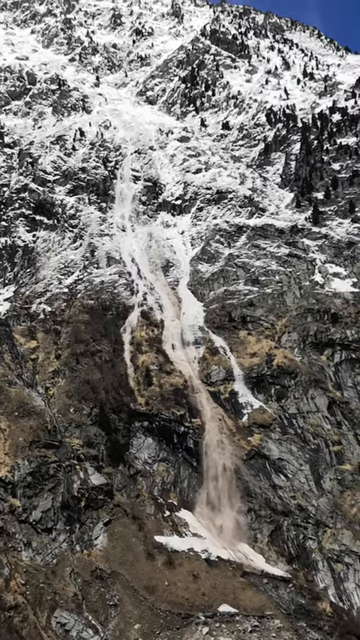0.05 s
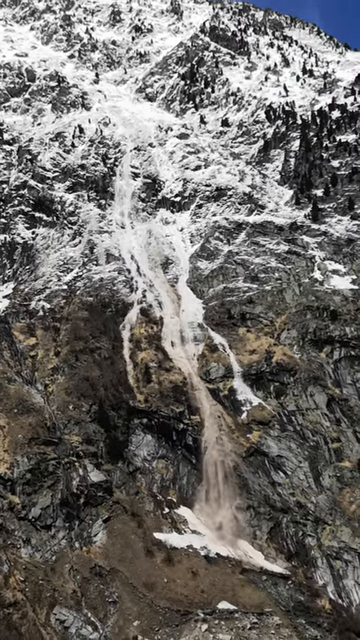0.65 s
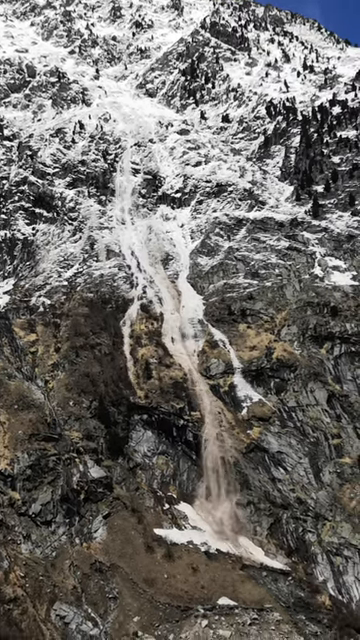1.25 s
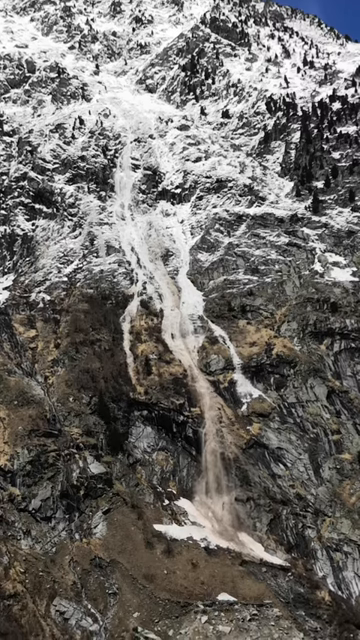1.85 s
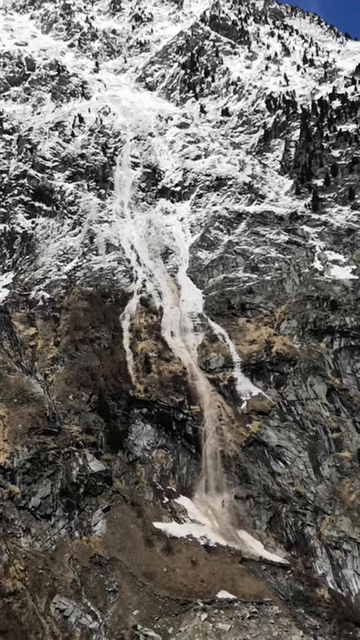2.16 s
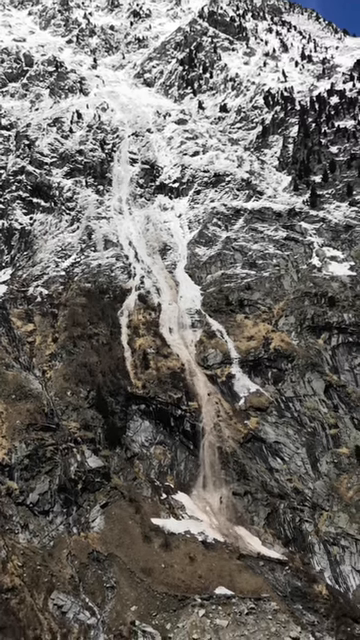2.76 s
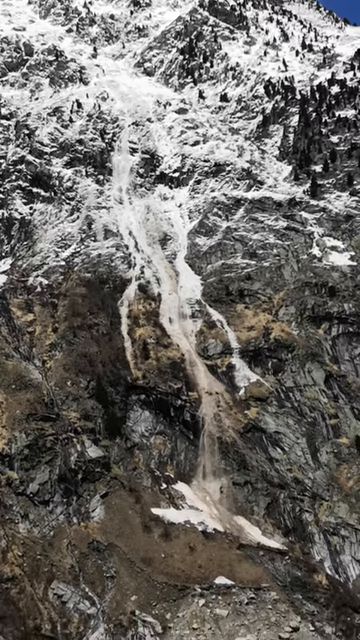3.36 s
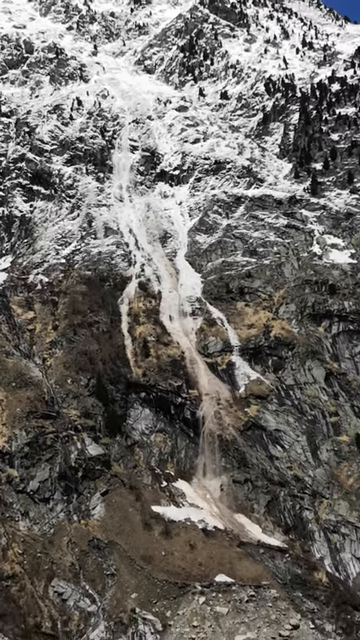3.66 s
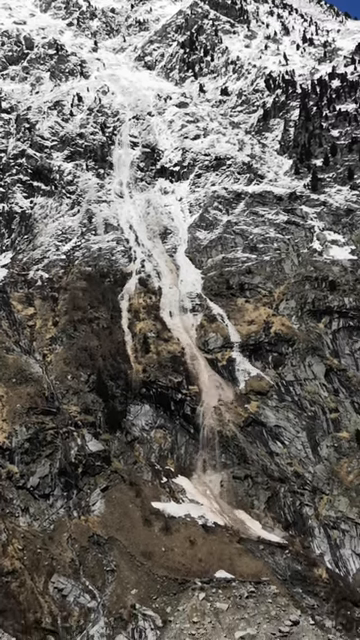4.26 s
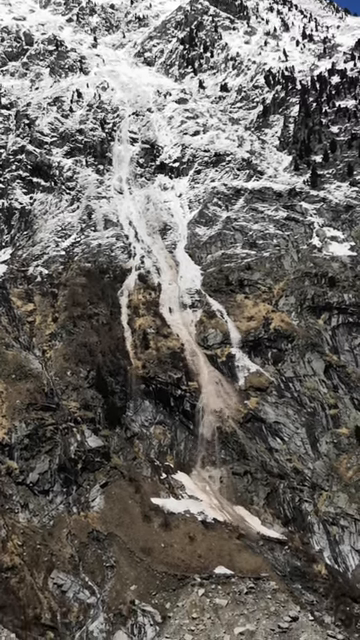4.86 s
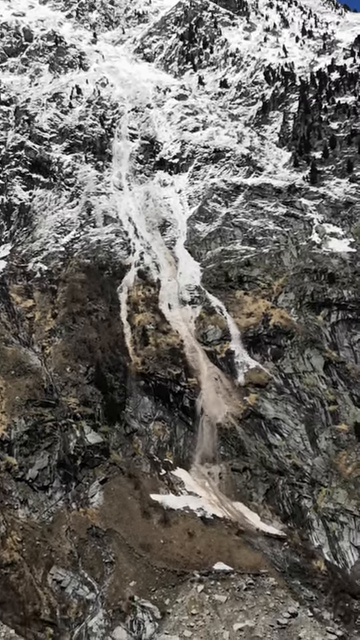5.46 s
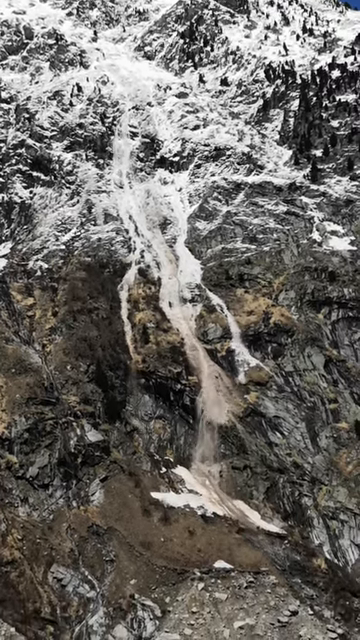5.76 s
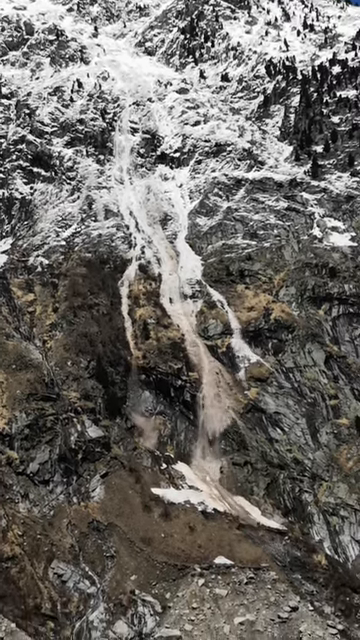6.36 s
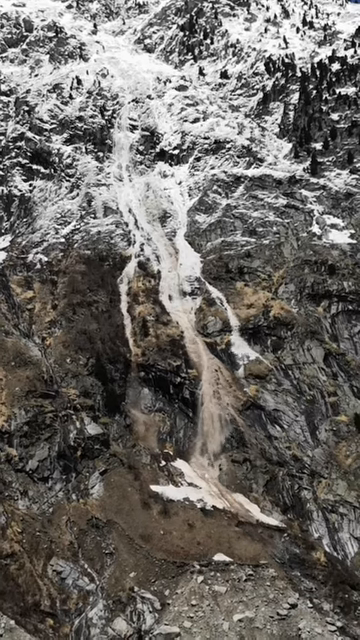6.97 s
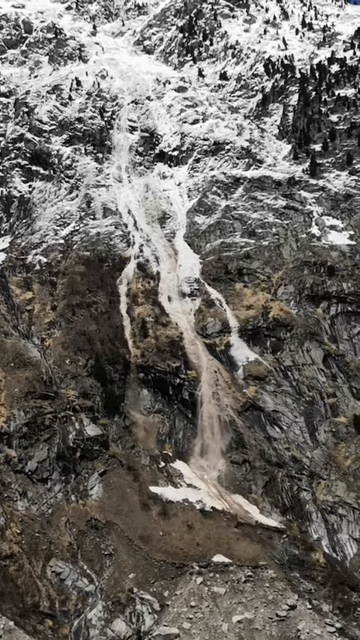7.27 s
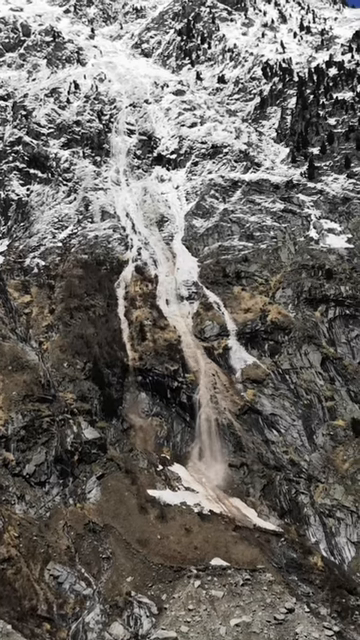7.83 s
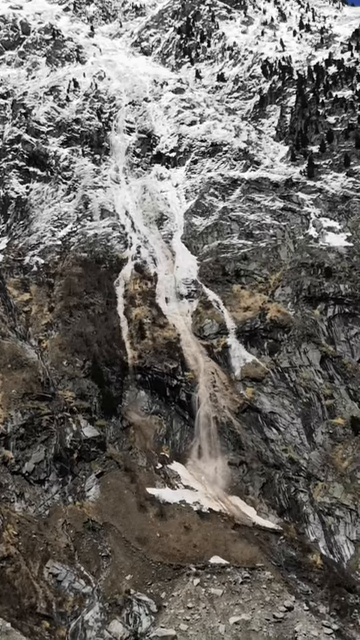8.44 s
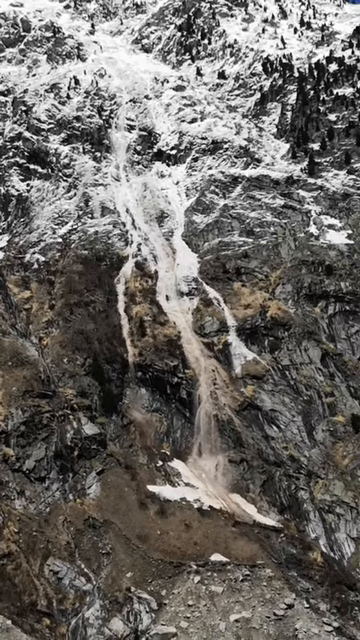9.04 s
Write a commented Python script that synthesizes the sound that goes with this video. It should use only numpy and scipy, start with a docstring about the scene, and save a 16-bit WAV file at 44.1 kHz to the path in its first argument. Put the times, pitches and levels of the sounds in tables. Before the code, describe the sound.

A far stream of snow and rock tumbles down a mountain face, making a soft, continuous roar that swells once near the start with a dull crash. Louder, uneven wind thumps and flutters right on the phone microphone, weakening after the middle. Several tiny dry clicks come nearby in the first seconds, while small birds chirp and whistle faintly on the right, here and there throughout.

```python
"""Gusts rumble and flutter over the two close microphone ports of a hand-held phone, with a faint hiss.
Behind them snow and stones pour down a far cliff: countless blows on rock merge into a dull roar,
with one big surge as a mass crashes down and its debris runs out.
Small birds chirp and whistle thinly, and there are a few light ticks nearby."""
import sys
import numpy as np
from scipy import signal
from scipy.fft import rfft, irfft
from scipy.io import wavfile
from scipy.ndimage import uniform_filter1d

SR = 44100
rng = np.random.default_rng(int(sys.argv[2]) if len(sys.argv) > 2 else 0)


def dump(signal):
    """Clip the signal to [-1, 1] and save it as 16-bit WAV at the path in sys.argv[1]."""
    limited = np.clip(np.atleast_2d(signal).T, -1, 1)
    pcm = np.round(limited * 32767).astype(np.int16)
    wavfile.write(sys.argv[1], SR, pcm)


N = 405719
TIME_S = np.arange(N) / SR
BINS_HZ = np.maximum(np.arange(N // 2 + 1) * SR / N, 1)


def undb(db):
    """Decibels to gain."""
    return 10 ** (np.asarray(db) / 20)


def curves(table):
    """Each column of a time table, per sample."""
    time_s, *columns = np.transpose(table)
    return [np.interp(TIME_S, time_s, column) for column in columns]


def spectra(table):
    """Each column of a frequency table, per bin."""
    hz, *columns = np.transpose(table)
    return [np.interp(np.log(BINS_HZ), np.log(hz), column) for column in columns]


def colour(x, table):
    """Filter by (frequency [Hz], gain [dB]) points."""
    return irfft(rfft(x) * undb(spectra(table)[0]), N)


def unit(x):
    """Scale to rms 1."""
    return x / np.sqrt(np.mean(x ** 2))


def band_rms(pair, low_hz, high_hz):
    """In-band rms of the mean of two channels."""
    in_band = (BINS_HZ > low_hz) & (BINS_HZ < high_hz)
    return np.std(irfft(rfft(pair.mean(axis=0)) * in_band, N))


def drift(rate_hz):
    """Smooth random curve, rms 1."""
    return unit(irfft(rfft(rng.standard_normal(N)) * np.exp(-(BINS_HZ / rate_hz) ** 2), N))


def impacts(per_s, spread_db):
    """Random impulses, many small and a few big."""
    hits = rng.random(N) < per_s / SR
    sizes = undb(spread_db * np.minimum(rng.exponential(size=N), 5))
    return unit(hits * sizes * rng.choice([-1, 1], N))


def hiss(flutter_db):
    """Faint airy hiss that rises with the gusts."""
    hiss_colour = [(1500, -20), (3000, 6.5), (4200, 1.5), (5600, 1), (6400, -2.5), (7600, -3), (8400, -7),
                   (15500, -7)]  # (frequency [Hz], gain [dB])
    still_db, gust_db, growth_db_per_db = -80.5, -68, 0.24
    strength_db = uniform_filter1d(flutter_db, size=SR // 12)
    air = unit(colour(rng.standard_normal((2, N)), hiss_colour))
    return air * (undb(still_db) + undb(gust_db + growth_db_per_db * strength_db))


def glide(length_s, points_hz):
    """Pitch bent through a start, middle and end point."""
    parabola = np.polyfit([0, .5, 1], points_hz, 2)
    return np.polyval(parabola, np.linspace(0, 1, int(length_s * SR)))


def settle(length_s, start_hz, final_hz):
    """Pitch that starts sharp and sinks onto its note."""
    progress = np.linspace(0, 1, int(length_s * SR))
    return final_hz + (start_hz - final_hz) * np.exp(-progress / .27)


def bird_notes():
    """Falling chirps, rising calls, thin whistles: (start [s], pitch [Hz], warble [Hz], level [dB])."""
    chirps = [(.62, .06, 5200, -75), (1.285, .05, 5800, -66), (1.425, .04, 5300, -75),
              (3.518, .045, 5350, -71.5), (6.3, .06, 4850, -73), (6.527, .018, 5400, -75),
              (6.622, .035, 5600, -78), (6.91, .03, 3950, -77), (7.295, .03, 5500, -81)]  # (start [s], length [s], middle pitch [Hz], level [dB])
    calls = [(3.06, -84), (5.47, -83), (6.02, -81), (6.565, -74.5), (7.13, -84)]  # (start [s], level [dB])
    # (start [s], length [s], start pitch [Hz], final pitch [Hz], level [dB])
    whistles = [(2.935, .055, 8200, 7900, -69), (2.998, .145, 7960, 7755, -56.5),
                (3.172, .05, 7860, 7795, -59), (3.21, .08, 7800, 7770, -68), (3.333, .11, 3980, 3740, -63),
                (3.44, .075, 3760, 3745, -77)]
    for start_s, length_s, hz, db in chirps:
        yield start_s, glide(length_s, (1.16 * hz, hz, .8 * hz)), 130, db
    for start_s, db in calls:
        yield start_s, glide(length_s=.115, points_hz=(3650, 4450, 4860)), 40, db
    for start_s, length_s, start_hz, final_hz, db in whistles:
        yield start_s, settle(length_s, start_hz, final_hz), 20, db


def birds():
    """Pure gliding notes from the right, with a faint scatter off the rocks."""
    scatter_db, scatter_t60_s = -10, .15
    song, warble = np.zeros(N), drift(rate_hz=300)
    for start_s, pitch_hz, warble_hz, db in bird_notes():
        first = int(start_s * SR)
        span = slice(first, first + len(pitch_hz))
        swell = np.sqrt(np.abs(np.sin(np.linspace(0, np.pi, len(pitch_hz)))))
        phase = 2 * np.pi * np.cumsum(pitch_hz + warble_hz * warble[span]) / SR
        song[span] += undb(db) * swell * np.sin(phase)
    song *= undb(2.8 * drift(rate_hz=140) - .8)  # flutter from moving air on the path
    tail = rng.standard_normal((2, SR // 2)) * undb(-60 * TIME_S[:SR // 2] / scatter_t60_s)
    scatter = signal.fftconvolve(song[None], tail / np.linalg.norm(tail[0]), axes=1)[:, :N]
    direct = np.array([np.roll(song, 1) * undb(-2.5), song * undb(2)])
    return direct + undb(scatter_db) * scatter


def ticks():
    """Tiny dry contacts near the right port: a click and a very short ring."""
    contacts = [(1.069, -38, -53), (1.516, -25, -35), (2.5345, -31, -44), (2.566, -35, -37)]  # (time [s], click level [dB], knock level [dB])
    click_colour = [(1000, -15), (3000, 0), (4500, 0), (6000, -5), (7300, -7), (8500, -35)]  # (frequency [Hz], gain [dB])
    ring_hz, decay_s, left_db = 2550, .0005, -15
    age_s = TIME_S[:SR // 50]
    ring = age_s / decay_s * np.exp(1 - age_s / decay_s) * np.sin(2 * np.pi * ring_hz * age_s)
    click, knock = np.zeros(N), np.zeros(N)
    for time_s, click_db, knock_db in contacts:
        first = int(time_s * SR)
        click[first] = undb(click_db)
        knock[first:first + len(ring)] += undb(knock_db) * ring
    return (colour(click, click_colour) + knock) * undb([[left_db], [0]])


def at_ports(source, port_colour, left_lead):
    """Cliff sound at two ports: a common part with a phase lead, plus scattered sound at each."""
    left_db, right_db, coherence = spectra(port_colour)
    coherence = np.clip(coherence, 0, 1)
    phase_shift = np.exp(.5j * spectra(left_lead)[0] * np.array([[1], [-1]]))
    common = rfft(source) * np.sqrt(coherence) * phase_shift
    scattered = rfft(rng.standard_normal((2, N))) * np.sqrt(1 - coherence)
    return irfft((common + scattered) * undb([left_db, right_db]), N)


def debris(port_colour, left_lead, body_rms, rush_rms):
    """Lumps strike rock: heavy ones make the low body, fine snow and grit the rush above it."""
    crossover_hz = 850
    lumps = impacts(per_s=2500, spread_db=2.5)
    powder = .65 * rng.standard_normal(N)
    pair = at_ports(unit(lumps + powder), port_colour, left_lead)
    body = irfft(rfft(pair) / (1 + (BINS_HZ / crossover_hz) ** 8), N)
    rush = pair - body
    body *= body_rms / band_rms(pair, 480, 800)
    rush *= rush_rms / band_rms(pair, 900, 2600)
    # moving air on the long path makes both waver
    return body * undb(0.62 * drift(rate_hz=6.9)) + rush * undb(0.79 * drift(rate_hz=11))


def pour(gust_db):
    """Steady stream down the cliff, a little louder in each gust."""
    levels = [(0, -60, -55.5), (.65, -59.5, -55.5), (2.6, -59.5, -53), (3.1, -61.5, -54.5),
              (3.6, -58.5, -54), (4.4, -60, -54), (5.1, -63.5, -55), (5.6, -65, -58), (5.82, -62, -55.5),
              (6, -65.5, -58), (6.7, -66, -59), (7, -65, -56.5), (7.6, -63, -57), (8.35, -59, -55.5),
              (8.9, -63, -55.5), (9.2, -65.5, -59)]  # (time [s], body level [dB], rush level [dB])
    # (frequency [Hz], left gain [dB], right gain [dB], coherence [0-1])
    port_colour = [(25,-77.5,-74,0.8), (70,-74.5,-75,1), (151,-73,-74.5,1), (250,-83.5,-82,1),
                   (408,-81.5,-81.5,1), (466,-87,-83,1), (647,-88.5,-84,0.1), (1053,-85,-83,0.67),
                   (1140,-87,-87,0.5), (1363,-84.5,-86,0.68), (1520,-85.5,-90,0), (2020,-89.5,-83.5,0.99),
                   (2390,-98.5,-84,0.1), (2725,-103.5,-93,.1), (3105,-112,-110,0.2), (4200,-145,-145,0.24)]
    left_lead = [(100, 0), (380, -.5), (500, -1.6), (670, -1.4), (830, -.1), (1020, -.2), (1620, -1.2),
                 (2000, -1.7), (2800, -3.6)]  # (frequency [Hz], phase [rad])
    carry_db_per_db = 0.097
    body_rms, rush_rms = undb(curves(levels) + carry_db_per_db * gust_db)
    return debris(port_colour, left_lead, body_rms, rush_rms)


def envelope(age_s, attack_s, hold_s, decay_s):
    """Linear attack, hold, exponential decay."""
    return np.clip(age_s / attack_s, 0, 1) * np.exp(-np.maximum(age_s - attack_s - hold_s, 0) / decay_s)


def surge_rms(attack_s, crash_db, runout_db):
    """Power sum of a short crash and a slowly sagging run-out."""
    start_s, sag_db_per_s = 0.695, 4
    age_s = TIME_S - start_s
    crash = envelope(age_s, attack_s, hold_s=0.21, decay_s=.08)
    runout = envelope(age_s, attack_s, hold_s=1.31, decay_s=0.12)
    return np.hypot(crash * undb(crash_db), runout * undb(runout_db - sag_db_per_s * age_s))


def surge():
    """One big mass lands and its debris runs out; the grit builds more slowly than the body."""
    # (frequency [Hz], left gain [dB], right gain [dB], coherence [0-1])
    port_colour = [(150,-93,-86.5,1), (368,-72,-73.5,0.25), (530,-77.5,-74,0.29), (715,-87,-75.5,0.26),
                   (808,-75.5,-79,0.95), (1000,-75,-72,0.73), (1190,-76.5,-77.5,.72), (1400,-70,-74,1),
                   (1650,-77,-79,1), (2060,-76.5,-69.5,0.71), (2490,-92,-73,0.15), (2760,-99,-85.5,.3),
                   (3200,-109,-109,.1), (4200,-145,-145,.1)]
    left_lead = [(200, -5), (400, -4.8), (530, -2), (840, .2), (1150, -.6), (2050, -1.8), (2800, -4.5)]  # (frequency [Hz], phase [rad])
    body_rms = surge_rms(attack_s=0.071, crash_db=-47, runout_db=-49.5)
    rush_rms = surge_rms(attack_s=0.12, crash_db=-49, runout_db=-49)
    return debris(port_colour, left_lead, body_rms, rush_rms)


def airflow():
    """Smooth gusts on a breeze: rumble level, flutter level and flutter excess over the breeze."""
    breeze = [(0, -44, -48.5), (.7, -41, -41.5), (.8, -47.5, -27.5), (1.3, -34.5, -31.5), (1.8, -45, -38),
              (2.1, -40, -38.5), (2.25, -43, -50), (3.05, -45, -48), (3.45, -55, -47), (3.65, -34.5, -40.5),
              (4.2, -35, -37.5), (4.5, -41, -51), (5.0, -53.5, -54.5), (5.5, -60, -71.5), (6.5, -59.5, -64),
              (7.05, -49.5, -59), (7.6, -71, -65), (8.2, -49, -52), (9.2, -71, -63)]  # (time [s], rumble level [dB], flutter level [dB])
    gusts = [(0.043, 0.092, -50, -27.5), (0.196, 0.12, -41, -33), (0.334, 0.035, -37.5, -34),
             (0.479, 0.057, -43, -26), (0.566, 0.016, -37, -37), (0.779, 0.043, -31, -27.5),
             (.91, 0.089, -32.5, -23), (1.464, .09, -33, -30), (1.645, 0.037, -25.5, -37),
             (2.177, 0.057, -38, -33.5), (2.315, 0.072, -37.5, -44), (2.536, 0.12, -39.5, -30.5),
             (2.856, 0.064, -37, -34), (3.19, 0.13, -36, -38.5), (3.369, 0.048, -32.5, -31),
             (3.545, .05, -27, -32), (3.79, 0.27, -36.5, -49), (3.965, 0.08, -51, -30),
             (4.153, 0.14, -28, -32.5), (4.324, 0.058, -30.5, -44), (4.595, 0.044, -41.5, -42),
             (4.808, .09, -35, -44.5), (5.222, 0.18, -40, -47.5), (5.351, 0.064, -34.5, -37.5),
             (5.703, 0.086, -35.5, -37), (5.799, 0.047, -36.5, -34.5), (5.89, 0.094, -40, -48),
             (6.317, 0.036, -40, -47), (6.788, 0.074, -33, -41), (6.922, 0.15, -41.5, -50.5),
             (7.283, 0.022, -35.5, -57), (7.926, 0.025, -39, -57), (8.665, 0.097, -40.5, -45),
             (8.884, .08, -37, -42), (9.18, 0.059, -39, -42.5)]  # (peak time [s], length [s], rumble level [dB], flutter level [dB])
    rise_share = 0.51
    breeze_db = curves(breeze)
    power = undb(breeze_db) ** 2
    for peak_s, length_s, *peak_db in gusts:
        width_s = length_s * np.where(TIME_S < peak_s, rise_share, 1 - rise_share)
        offset = (TIME_S - peak_s) / width_s
        near = np.abs(offset) < 4
        power[:, near] += undb(peak_db)[:, None] ** 2 * np.exp(-offset[near] ** 2)
    rumble_db, flutter_db = 10 * np.log10(power)
    gust_db = uniform_filter1d(flutter_db - breeze_db[1], size=SR // 10)
    return rumble_db, flutter_db, gust_db


def eddies(eddy_colour, span_s):
    """Turbulent pressure, its strength evened out over a span."""
    pressure = colour(impacts(per_s=900, spread_db=4.5), eddy_colour)
    size = int(span_s * SR)
    power = uniform_filter1d(uniform_filter1d(pressure ** 2, size), size)
    return unit(pressure / np.sqrt(power + .02 * np.mean(power)))


def buffets():
    """The hardest single eddies, one swing of pressure each."""
    swings = [(0.032, -17, 214), (.063, -14.5, 179), (0.142, -22.5, 195), (.773, -18, 182),
              (0.806, -13, 161), (1.518, -19.5, 260), (1.62, -15.5, 274), (2.557, -16, 169),
              (3.245, -24, 200), (3.378, -24.5, 205), (3.53, -19.5, 210), (3.782, -27.5, 200),
              (4.057, -16, 70), (4.16, -15.5, 98.5), (4.285, -25.5, 140), (4.498, -27.5, 181),
              (5.386, -22, 109), (5.772, -17.5, 91)]  # (time [s], peak level [dB], centre frequency [Hz])
    pressure = np.zeros(N)
    for time_s, db, hz in swings:
        near = np.abs(TIME_S - time_s) < 2 / hz
        offset_sq = (np.pi * hz * (TIME_S[near] - time_s)) ** 2
        pressure[near] += undb(db) * (1 - 2 * offset_sq) * np.exp(-offset_sq)
    return pressure


def wind(rumble_db, flutter_db):
    """Eddies sweep the left port, then the sheltered right; each port adds turbulence of its own."""
    # all five: (frequency [Hz], gain [dB])
    rumble_colour = [(12, -17.5), (25, -6), (45, -1), (75, 3.5), (100, -1), (135, -11), (300, -52.5),
                     (1500, -110)]
    flutter_colour = [(40, -33.5), (80, -8.5), (115, 1.5), (160, -2.5), (205, -8), (270, -17), (370, -32),
                      (550, -48), (2500, -100)]
    fine_colour = [(100, -25.5), (220, 4), (300, -0.5), (380, -9), (520, -17), (1100, -61.5), (3000, -100)]
    lee_loss = [(80, -0.4), (160, -0.6), (280, -3), (450, -4)]
    port_eddy_colour = [(30, 2), (110, 2), (200, 3), (380, -10.5), (600, -13.5), (1200, -44.5),
                        (3000, -99.5)]
    fine_offset_db, port_offset_db, fine_db_per_db = -17.5, -21.5, 1.47
    tumble_db, lee_lag_s = 2.5, 0.00088
    rumble = eddies(rumble_colour, span_s=0.053) * undb(rumble_db)
    flutter = eddies(flutter_colour, span_s=.045) * undb(flutter_db)
    tumble = unit(undb(tumble_db * drift(rate_hz=14)))  # the air comes in lumps
    # fast air makes finer eddies: they grow as flutter outweighs rumble
    speed_db = np.clip(uniform_filter1d(flutter_db - rumble_db, size=SR // 6), -8, 7)
    fine_db = flutter_db + fine_offset_db + fine_db_per_db * speed_db
    fine = eddies(fine_colour, span_s=0.11) * undb(fine_db)
    left = (rumble + flutter) * tumble + buffets() + fine
    right = colour(np.interp(TIME_S - lee_lag_s, TIME_S, left), lee_loss)
    port_eddies = unit(colour(rng.standard_normal((2, N)), port_eddy_colour))
    return np.array([left, right]) + port_eddies * undb(flutter_db + port_offset_db)


def scene():
    """The far fall, the wind at the phone and the small sounds between."""
    rumble_db, flutter_db, gust_db = airflow()
    return pour(gust_db) + surge() + wind(rumble_db, flutter_db) + hiss(flutter_db) + birds() + ticks()


def record(dry):
    """The phone cuts the top treble steeply."""
    cutoff_hz = 15700
    return signal.sosfilt(signal.ellip(8, .2, 70, cutoff_hz, fs=SR, output="sos"), dry)


dry = scene()
out = record(dry)
dump(out)
```